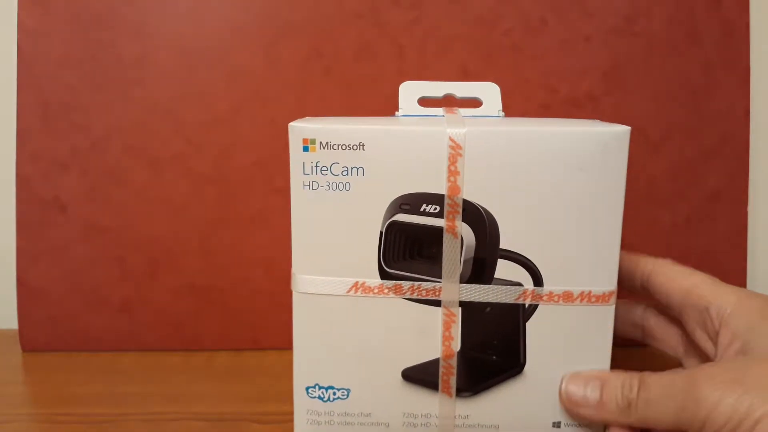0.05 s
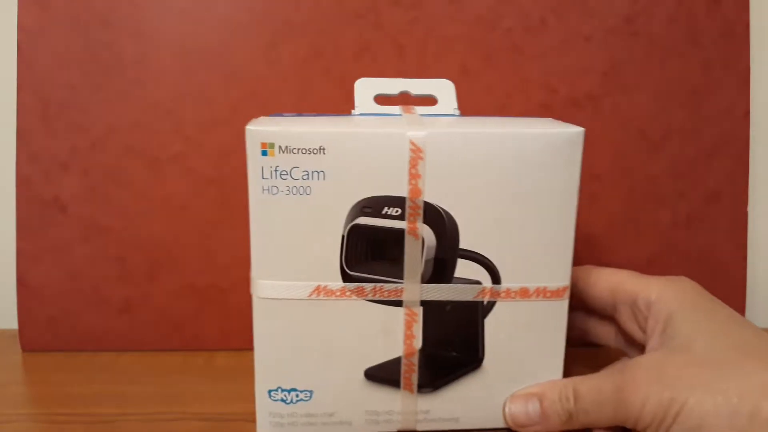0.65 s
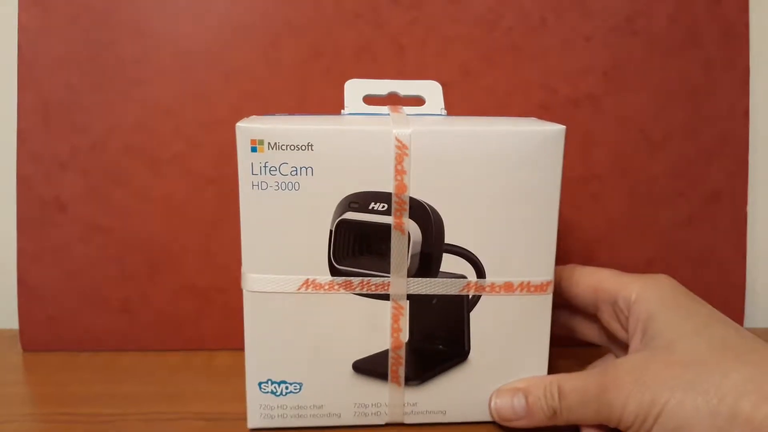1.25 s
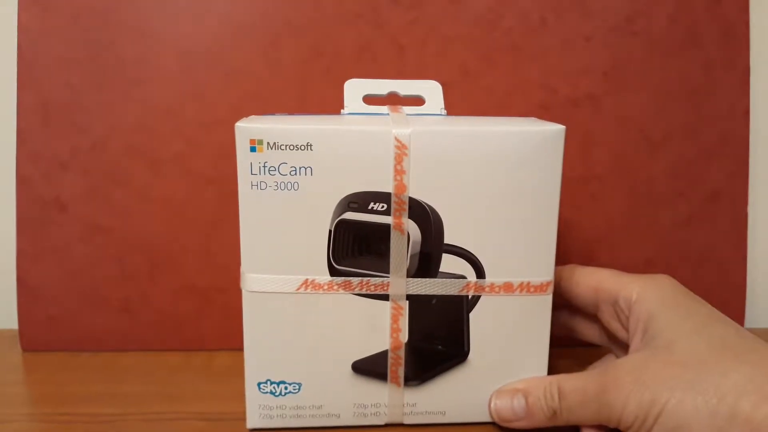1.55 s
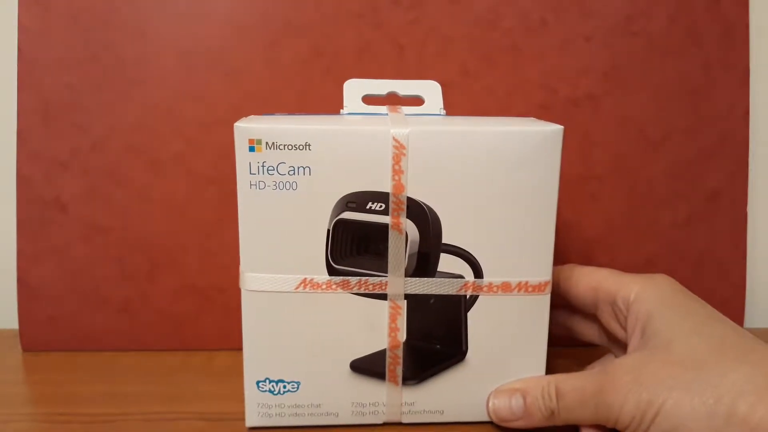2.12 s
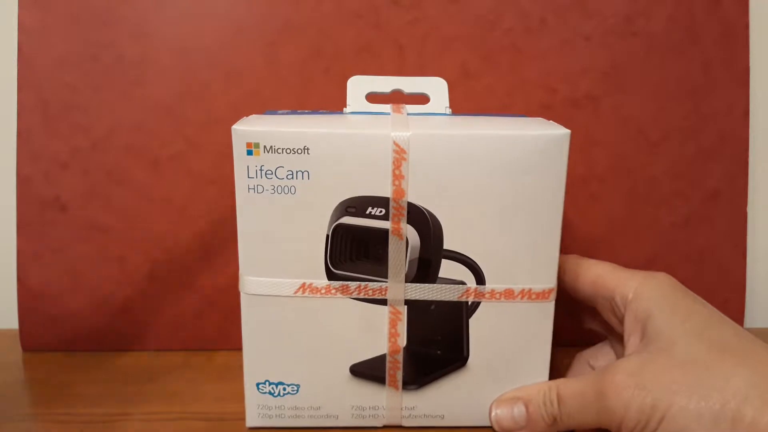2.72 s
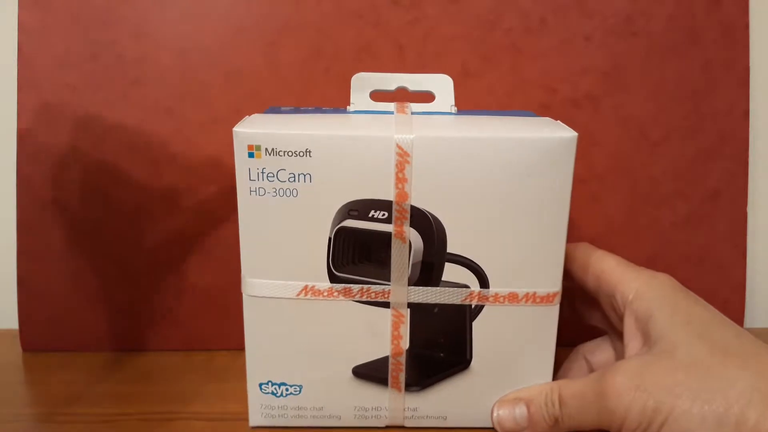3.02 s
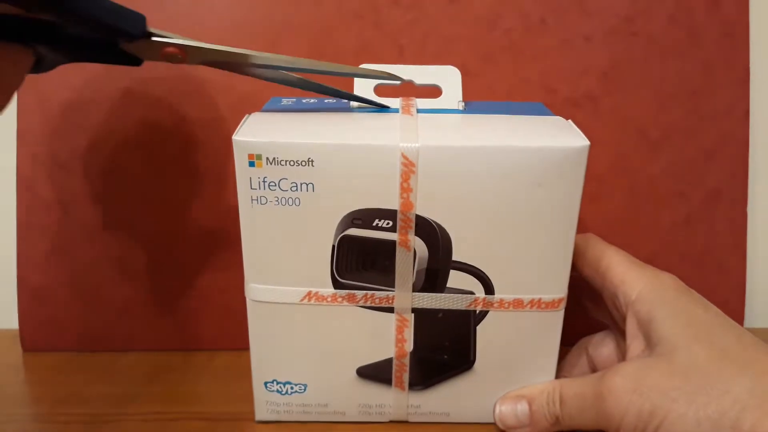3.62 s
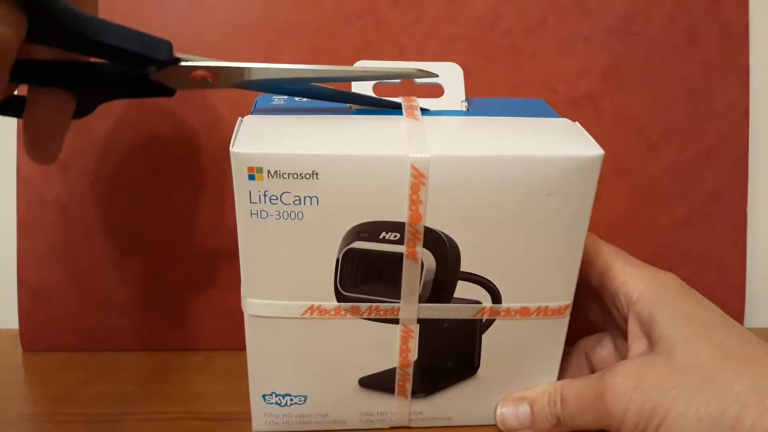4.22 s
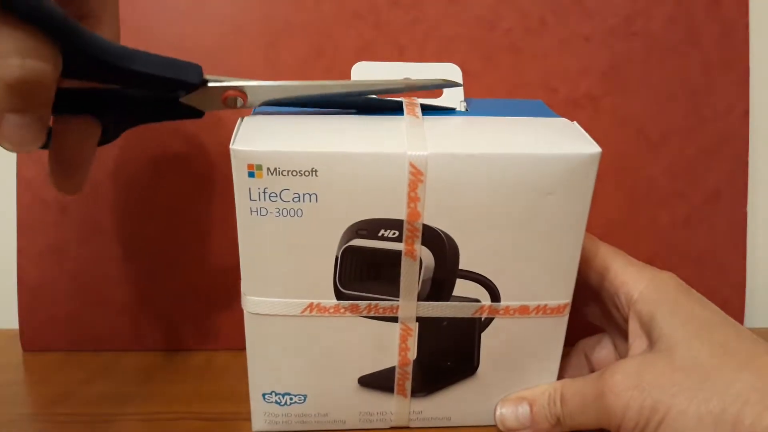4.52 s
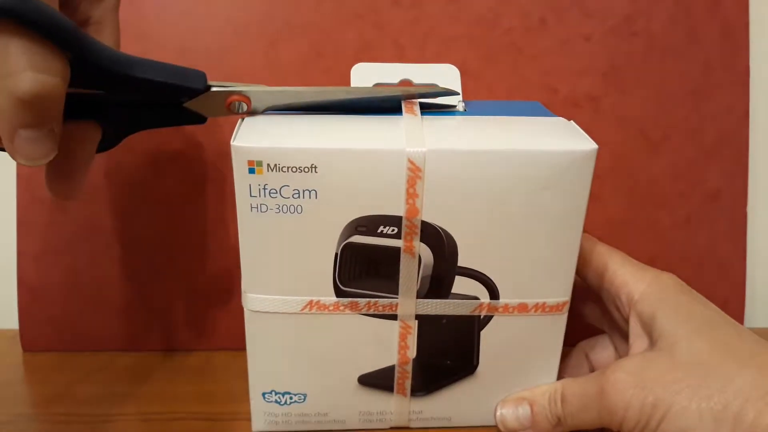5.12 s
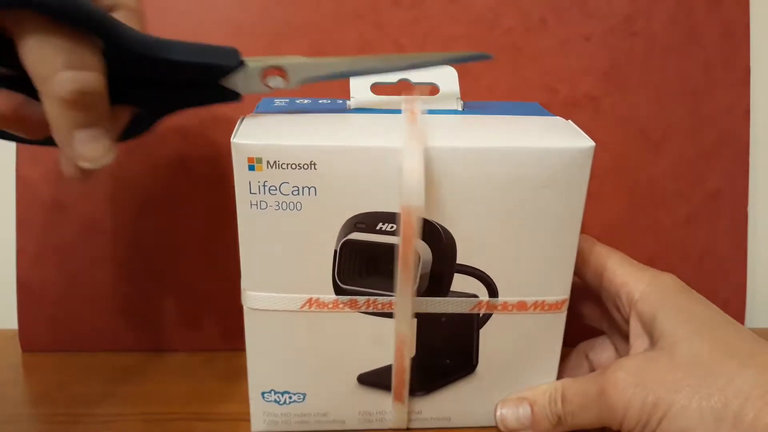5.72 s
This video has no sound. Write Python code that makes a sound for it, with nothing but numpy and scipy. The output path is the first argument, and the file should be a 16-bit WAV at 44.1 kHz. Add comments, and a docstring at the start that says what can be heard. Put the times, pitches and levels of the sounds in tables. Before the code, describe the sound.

Indoors, a box is nudged across a table with hard knocks; scissors are handled quietly, then cut a taut strap with a sharp snap.

```python
"""In a small, faintly humming room, a cardboard box is nudged over a wooden table with hard clacks
and soft bumps, skin brushing its sides. From about one second, scissors rasp in the hand; later
their blades tick and the dry pivot squeaks once. From 3.5 s the blades tap the hollow box and
scrape along a taut plastic strap. They bite, the strap snaps at 5.6 s, and its loose ends
slap and skid over the cardboard."""
import sys
import numpy as np
from scipy import signal
from scipy.fft import rfft, irfft
from scipy.io import wavfile

SR = 44100
rng = np.random.default_rng(int(sys.argv[2]) if len(sys.argv) > 2 else 0)


def wav_record(signal):
    """Record a signal, one row per channel, as 16-bit PCM in the file named by sys.argv[1]."""
    frames = np.transpose(np.atleast_2d(signal))
    bounded = np.clip(frames, -1, 1)
    # unit amplitude maps onto the largest positive 16-bit level
    quanta = np.round(bounded * 32767).astype(np.int16)
    wavfile.write(sys.argv[1], SR, quanta)


N = 253795
T = np.arange(N) / SR
RING_TIME = T[:SR // 4]

# Appliance hum. Each row: pitch in Hz, rms level in dB.
HUM_TONES = [(120, -68.5), (131, -59.5), (139, -58), (257, -60.5), (290, -59)]
# Shoves of the box, then brushes of skin. Each row: fastest moment in seconds, level in dB.
SLIDES = [(0, -25.5), (0.254, -40), (.42, -45.5), (.51, -50), (.58, -49), (.92, -55)]
BRUSHES = [(.07, -57), (.24, -57.5), (.6, -68.5), (.92, -80.5), (2.475, -70.5), (2.62, -71.5),
           (2.87, -74.5)]
# Hand on the box. Each row: start in seconds, length in seconds, level in dB, pitch in Hz.
BUMPS = [(0, 0.063, -29.5, 270), (0, 0.071, -35, 216), (1.29, .048, -44.5, 265), (1.741, 0.04, -46, 284),
         (2.778, 0.037, -45.5, 465), (3.071, 0.034, -46.5, 388), (3.34, 0.055, -47, 284)]
# Hard handling knocks. Each row: start in seconds, level in dB, relative table thump in dB.
CLACKS = [(0.003, -10.5, -9), (0.0199, -9, -14.5), (0.034, -28, 4.5), (0.0697, -18.5, -10),
          (0.1206, -19, -8.5), (0.1932, -32, -15), (0.2244, -26.5, -8), (0.245, -20, -6.5),
          (0.306, -26.5, -9), (0.408, -40, -6), (0.418, -39.5, -17), (0.5604, -27, -6.5),
          (0.9762, -31, -25), (1.1894, -30, -8.5), (1.331, -37, -4), (1.473, -36.5, -7),
          (1.4955, -36.5, -2), (2.069, -32, -2.5), (2.0741, -30, 2.5)]
# Scissors in the hand. Each row: start and length in seconds, level in dB, treble cutoff in Hz,
# relative ring in dB.
RASPS = [(0.986, 0.076, -49, 9000, 6), (1.2, 0.03, -53.5, 4000, -17), (1.332, 0.044, -50.5, 8000, -10),
         (1.625, .093, -62, 1890, -4), (2.245, 0.035, -63.5, 4166, -9.5), (2.783, .065, -54, 6000, -16),
         (3.055, .05, -52, 4100, 1), (3.341, 0.052, -56.5, 3600, -17)]
# Blade catching on blade. Each row: start in seconds, level in dB.
TICKS = [(2.881, -41.5), (5.478, -42.5), (5.4951, -35.5), (5.521, -33), (5.563, -25.5), (5.5862, -24),
         (5.5995, -25)]
# Blades on box and strap. Each row: start in seconds, level in dB, relative tick and boom in dB.
TAPS = [(3.575, -39, -17, 16), (3.6215, -16, -21.5, 7.5), (3.908, -36, -21.5, 6), (3.942, -22, -35, -8),
        (4.2355, -42, -30, -2), (4.603, -38, -43, 18), (5.496, -23, -28, 22), (5.5671, -15.5, -33, 2),
        (5.585, -34, -20, 4), (5.5998, -13, -18, -5)]
# Blade along the strap. Each row: fastest moment in seconds, cardboard in dB, edge hiss in dB.
SCRAPES = [(3.65, -49.5, -56), (3.715, -46, -61.5), (3.934, -45, -59), (4.125, -50.5, -72),
           (4.323, -47, -62), (4.395, -47, -53), (4.615, -58.5, -88.5), (4.725, -63, -93)]
# The break and its slaps. Each row: start in seconds, level in dB, relative lid ring and boom in dB.
SNAPS = [(5.6115, -7, -9, -20), (5.613, -8, 7.5, -25), (5.622, -9, -2, -5.5), (5.6264, -14, -1, -7.5),
         (5.632, -12.5, -9, -0.5), (5.6416, -9, -25, -10.5), (5.6482, -21, 0, -20)]

# Resonances of each body. Each row: pitch in Hz, level in dB, seconds to fade by 60 dB.
TABLE_MODES = [(135, -10, .07), (188.5, 2.5, .08), (287, 17.5, .09), (411.5, 5, 0.21), (486.4, 12.5, 0.038),
               (575, -3.5, .04)]
CLACK_MODES = [(685, -14, .04), (994, -27.5, .02), (1263, -3, 0.011), (1450, -5.5, 0.032),
               (1420, 4.5, 0.049), (1927, -6, .014), (2274, -4, .015), (2713, -12.5, .008),
               (3814, -13.5, .008), (4523, -14, .006)]
RASP_MODES = [(1420, 0, .014), (1650, -4, .014), (2350, -3, .02), (2880, -11, .016), (3700, -13, .012),
              (5300, -15, .015), (8600, -19, .008)]
PIVOT_MODES = [(1370, 1.5, 0.014), (1870, -4.5, 0.0081), (3700, -10, .01), (5300, -5, 0.0046),
               (7500, -7.5, 0.0063), (8600, -18, 0.009)]
BOX_MODES = [(218.2, -4, 0.12), (325.2, -6, 0.08), (372, -4.5, 0.033), (443, -5, 0.049)]
LID_MODES = [(540, -22, 0.022), (646, -4, 0.038), (845, 0.5, 0.045), (882, -0.5, 0.031), (1240, -21, 0.024),
             (1450, -13, 0.069)]
STEEL_MODES = [(1210, -24, 0.026), (2370, -3, 0.081), (4350, -12, 0.0092), (6090, 0, 0.011),
               (8100, 0.5, 0.019)]

# Tone colours of the air, hits and rubs. Each row: frequency in Hz, relative level in dB.
AIR_COLOUR = [(15, -42.5), (25, -37), (70, -17), (117, -4.5), (153, -1), (185, -27), (270, 1.5), (309, -12),
              (344, -12.5), (427, -5.5), (887, -23.5), (1520, -21.5), (1890, -31.5), (3080, -39),
              (16000, -63)]
LOW_AIR_COLOUR = [(25, -37), (42, -11.5), (54, 5), (85, -8.5), (120, 7), (165, 0), (210, 7.5), (300, -6.5),
                  (400, 0.5), (900, -40)]
SLIDE_COLOUR = [(50, -17.5), (130, -2), (290, 0.5), (420, -4), (800, -4), (1500, -13.5), (2300, -19),
                (4000, -30.5), (7000, -37.5), (16000, -59)]
CLACK_COLOUR = [(200, -20), (650, 2.5), (830, -11), (1150, 4), (1900, 3.5), (2800, -7), (4300, -10),
                (6300, -22.5), (9000, -29), (10500, -40), (16000, -38.5)]
BRUSH_COLOUR = [(2000, -27.5), (5000, -9.5), (7000, -5), (8700, 4), (10200, -12), (13000, -5), (15500, -8)]
RASP_COLOUR = [(300, 1), (650, 16), (850, -1.5), (1450, 3), (2300, -0.5), (3200, -9), (5500, -15),
               (6500, -15), (8700, -14.5), (10500, -31), (16000, -5)]
TICK_COLOUR = [(1000, -31), (4000, 10), (6000, 3), (8700, 11), (10500, -6), (16000, 13)]
EDGE_COLOUR = [(500, 24), (1800, -39), (2400, 23.5), (3000, 7), (4000, 16), (6500, 0.5), (9000, -2),
               (11000, -24), (16000, -88)]
CARD_COLOUR = [(150, -10), (300, 6.5), (450, 4.5), (700, 4), (900, 1.5), (1200, -4.5), (2000, -36),
               (4000, -38)]
HISS_COLOUR = [(1500, 7.5), (2800, -4), (3800, 6.5), (6000, -6.5), (8500, -5), (10500, -15), (16000, -19)]
STRAP_COLOUR = [(60, -21), (130, 20), (200, -9), (400, -19), (1000, 11), (1400, 3), (1800, -6.5),
                (2450, -1), (3000, -1.5), (4000, 3), (5300, -13.5), (8400, -29.5), (11000, -15),
                (16000, -12.5)]
SKID_COLOUR = [(60, -24), (130, -6), (220, 4.5), (400, 7), (1000, -3), (1800, -5), (2450, 0.5), (3500, -12),
               (5300, -16), (8600, -8.5), (11000, -14.5), (16000, -26)]

# The room's tail. Each row: frequency in Hz, seconds to fade by 60 dB.
ROOM_T60 = [(150, 0.37), (600, 0.2), (3000, 0.25), (8000, 0.17), (16000, 0.23)]


def amp(db):
    return 10 ** (np.asarray(db) / 20)


def unit(x):
    """Scale to rms 1."""
    return x / np.sqrt(np.mean(x ** 2))


def peak(x):
    """Scale to peak 1."""
    return x / np.abs(x).max()


def add(out, start, x):
    """Mix a sound in at a start time in seconds."""
    i = max(int(start * SR), 0)
    out[i:i + len(x)] += x[:N - i]


def on_log(points, hz):
    """Read a curve on a log-frequency axis."""
    freqs, values = np.transpose(points)
    return np.interp(np.log(np.maximum(hz, 1)), np.log(freqs), values)


def band(x, hz, kind, order=2):
    """Butterworth filter."""
    return signal.sosfilt(signal.butter(order, np.minimum(hz, SR / 2 - 1), kind, fs=SR, output="sos"), x)


def through(x, response):
    """Pass a sound through an impulse response."""
    return signal.fftconvolve(x, response)[:len(x)]


def click(colour):
    """The tightest click that has this tone colour."""
    size = 2 * len(RING_TIME)
    hz = np.arange(size // 2 + 1) * SR / size
    cepstrum = irfft(np.log(amp(on_log(colour, hz))))
    cepstrum[1:size // 2] *= 2  # fold to minimum phase
    cepstrum[size // 2:] = 0
    return peak(irfft(np.exp(rfft(cepstrum)))[:len(RING_TIME)])


def ring(modes, detune=0.022):
    """Damped modes; each contact point tunes them a little differently."""
    hz, db, t60 = np.transpose(modes)[:, :, None]
    hz = hz * (1 + detune * rng.standard_normal(hz.shape))
    decay = np.exp(-np.log(1000) * RING_TIME / t60)
    return peak(np.sum(amp(db) * np.sin(2 * np.pi * hz * RING_TIME) * decay, axis=0))


def contact(colour, chatter_s, chatter_db=-2, split_hz=2400):
    """A clean push in the lows, a dying burst of micro-impacts in the highs."""
    push = click(colour)
    burst = rng.standard_normal(len(RING_TIME)) * np.exp(-RING_TIME / chatter_s)
    burst = through(burst / np.linalg.norm(burst), push)
    return 2 * (band(push, split_hz, "low") + amp(chatter_db) * band(burst, split_hz, "high"))


def friction(response, grain_db):
    """Dense micro-slips of uneven size sounding through a body; zero grain gives smooth noise."""
    sizes = amp(grain_db * np.repeat(rng.standard_normal(N // 32 + 1), 32)[:N])
    return unit(through(rng.standard_normal(N) * sizes, response))


def swells(times, peaks_db, rise_db_per_s, fall_db_per_s):
    """Envelope of a run of rubs: each builds to its peak and dies away."""
    since = T - times[:, None]
    db = peaks_db[:, None] - np.maximum(-rise_db_per_s * since, fall_db_per_s * since)
    return amp(np.maximum(db.max(axis=0), -200))


def stroke(x, length, fade_share):
    """A stretch of steady sound, eased in and out."""
    count = max(int(length * SR), 2)
    return unit(x[-count:]) * signal.windows.tukey(count, fade_share)


def room_tone(air_db=-58, low_db=-56, waver_hz=1.5, waver_db=2):
    """A bed of still air and a softly wavering appliance hum."""
    out = amp(air_db) * friction(click(AIR_COLOUR), grain_db=0)
    out += amp(low_db) * friction(click(LOW_AIR_COLOUR), grain_db=0)
    knots = np.linspace(0, T[-1], 40)
    for hz, db in HUM_TONES:
        drift, swell = (np.interp(T, knots, v) for v in rng.standard_normal((2, len(knots))))
        phase = 2 * np.pi * np.cumsum(hz + waver_hz * drift) / SR
        out += np.sqrt(2) * amp(db + waver_db * swell) * np.sin(phase)
    return out


def box_slides(table_db=-4):
    """The box drags over the wood and sets the table top ringing."""
    body = unit(click(SLIDE_COLOUR)) + amp(table_db) * unit(ring(TABLE_MODES))
    envelope = swells(*np.transpose(SLIDES), rise_db_per_s=164, fall_db_per_s=148)
    return envelope * friction(body, grain_db=1.2)


def hand_bumps():
    """The steadying hand bumps the box: soft puffs of low noise."""
    out = np.zeros(N)
    for start, length, db, hz in BUMPS:
        thud = band(rng.standard_normal(SR // 2), [0.7 * hz, 1.3 * hz], "band")
        add(out, start, amp(db) * stroke(thud, length, fade_share=0.89))
    return out


def clacks(ring_db=-8, hard_tick_db=5.5, fully_hard_db=-18.5):
    """Hard plastic knocks: a brief tick, a few milliseconds of chatter and a thump of the table top."""
    out = np.zeros(N)
    for start, db, thump_db in CLACKS:
        # harder hits are brighter, until the contact is fully hard
        tick_db = hard_tick_db + 1.02 * min(db - fully_hard_db, 0)
        knock = contact(CLACK_COLOUR, chatter_s=0.0041, chatter_db=-2.5, split_hz=1200)
        knock = band(knock + amp(ring_db) * ring(CLACK_MODES, detune=0.019), 2400, "low")
        tick = band(contact(CLACK_COLOUR, chatter_s=0.0008, chatter_db=-3.5), 2800, "high")
        thump = band(ring(TABLE_MODES, detune=0.023), 150, "high")
        add(out, start, amp(db) * (knock + amp(tick_db) * tick + amp(thump_db) * thump))
    return out


def skin_brushes():
    """Skin grazes the cardboard with an airy hiss."""
    envelope = swells(*np.transpose(BRUSHES), rise_db_per_s=128, fall_db_per_s=161)
    return envelope * friction(click(BRUSH_COLOUR), grain_db=2)


def scissor_rasps():
    """Scissor parts rub together in short, gritty strokes."""
    out = np.zeros(N)
    for start, length, db, cutoff_hz, ring_db in RASPS:
        body = unit(click(RASP_COLOUR)) + amp(ring_db) * unit(ring(RASP_MODES, detune=0.055))
        grit = friction(body, grain_db=2.9)[:SR // 2]
        grit = band(grit, cutoff_hz, "low", order=3)
        add(out, start, amp(db) * stroke(grit, length, fade_share=0.2))
    return out


def blade_ticks():
    """The blades catch on each other as they close, tiny and bright."""
    out = np.zeros(N)
    for start, db in TICKS:
        add(out, start, amp(db) * contact(TICK_COLOUR, chatter_s=0.0018))
    return out


def pivot_squeak(start=3.201, length=0.045, db=-58):
    """The dry pivot squeaks once as the scissors are lifted."""
    out = np.zeros(N)
    squeak = friction(ring(PIVOT_MODES), grain_db=2)
    add(out, start, amp(db) * stroke(squeak, length, fade_share=0.14))
    return out


def hollow_box(detune):
    """The panels of the box boom; it is too small to radiate deep bass."""
    return peak(band(ring(BOX_MODES, detune), 215, "high", order=3))


def blade_taps(cutoff_hz=1300, boom_trim_db=-7, dent_db=1):
    """A blade dents the lid, the hollow box answers, and the steel edge ticks."""
    out = np.zeros(N)
    for start, db, tick_db, boom_db in TAPS:
        lid = ring(LID_MODES, detune=0.024)
        boom = amp(boom_db + boom_trim_db) * hollow_box(detune=0.011)
        dent = amp(dent_db) * click(CARD_COLOUR)
        card = peak(band(lid + boom + dent, cutoff_hz, "low"))
        tick = amp(tick_db) * contact(EDGE_COLOUR, chatter_s=0.0018)
        add(out, start, amp(db) * (card + tick))
    return out


def blade_scrapes(card_trim_db=-1, hiss_trim_db=-3):
    """Steel drags along the strap: coarse cardboard grain under a fine edge hiss."""
    times, card_db, hiss_db = np.transpose(SCRAPES)
    slopes = dict(rise_db_per_s=447.5, fall_db_per_s=192)
    card = swells(times, card_db + card_trim_db, **slopes) * friction(click(CARD_COLOUR), grain_db=5.2)
    hiss = swells(times, hiss_db + hiss_trim_db, **slopes) * friction(click(HISS_COLOUR), grain_db=2.9)
    return card + hiss


def strap_snap(steel_db=-8, skid_db=-9.5, damping_s=0.0095):
    """The strap breaks, jolting lid and blades; its ends slap and skid across the box."""
    out = np.zeros(N)
    choke = np.exp(-RING_TIME / damping_s)  # the strap damps the panels it strikes
    for start, db, lid_db, boom_db in SNAPS:
        tear = contact(STRAP_COLOUR, chatter_s=0.0012, chatter_db=1, split_hz=560)
        steel = amp(steel_db) * ring(STEEL_MODES, detune=0.011)
        lid = amp(lid_db) * ring(LID_MODES)
        boom = amp(boom_db) * hollow_box(detune=0.097)
        add(out, start, amp(db) * (band(tear + steel + lid, 390, "high") + boom) * choke)
    times, slap_db = np.transpose(SNAPS)[:2]
    skid = swells(times, slap_db + skid_db, rise_db_per_s=25000, fall_db_per_s=1050)
    return out + skid * friction(click(SKID_COLOUR), grain_db=5)


def room(x, wet_db=-5, early_db=-14):
    """Table and wall reflect at once; a short diffuse tail follows, lingering longest in the bass."""
    t, tail = T[:SR // 2], 0
    for hz in 62.5 * 2 ** np.arange(9):
        octave = band(rng.standard_normal(len(t)), hz * np.sqrt([0.5, 2]), "band")
        tail += octave * np.exp(-np.log(1000) * t / on_log(ROOM_T60, hz))
    tail *= 1 - np.exp(-t / 0.0016)
    response = amp(wet_db) * tail / np.linalg.norm(tail)
    for lag_s, share in [(0.0023, 0.49), (0.0056, 0.58)]:
        response[int(lag_s * SR)] += share * amp(early_db)
    return x + through(x, response)


def scene():
    """Hits and rubs share one room over a bed of room tone, in mono."""
    hits = clacks() + blade_taps() + blade_ticks() + strap_snap()
    handling = scissor_rasps() + hand_bumps() + pivot_squeak()
    rubs = box_slides() + skin_brushes() + blade_scrapes()
    return (room(hits + handling + rubs) + room_tone())[None]


def record(dry):
    """The microphone sheds the deep bass, tops out at full scale and cuts the highest treble."""
    clipped = np.clip(band(dry, 52, "high", order=4), -1, 1)
    treble_cut = signal.ellip(10, 0.2, 80, 15950, fs=SR, output="sos")
    return signal.sosfilt(treble_cut, clipped)


dry = scene()
out = record(dry)
wav_record(out)
```